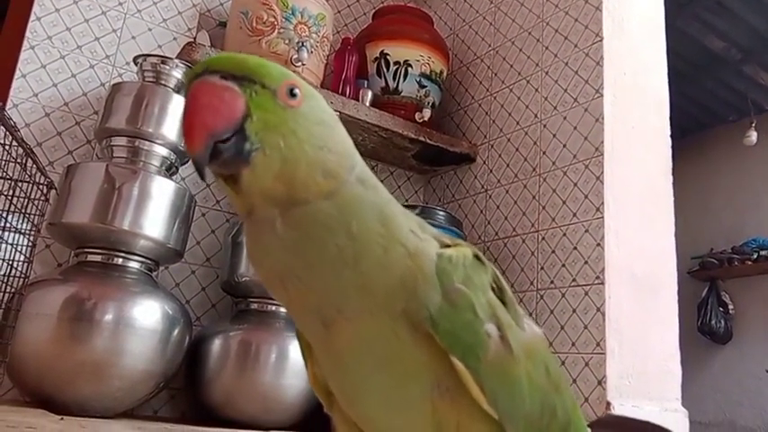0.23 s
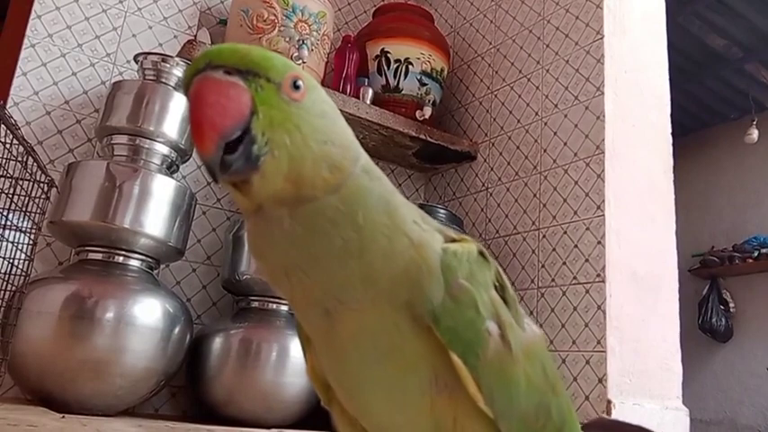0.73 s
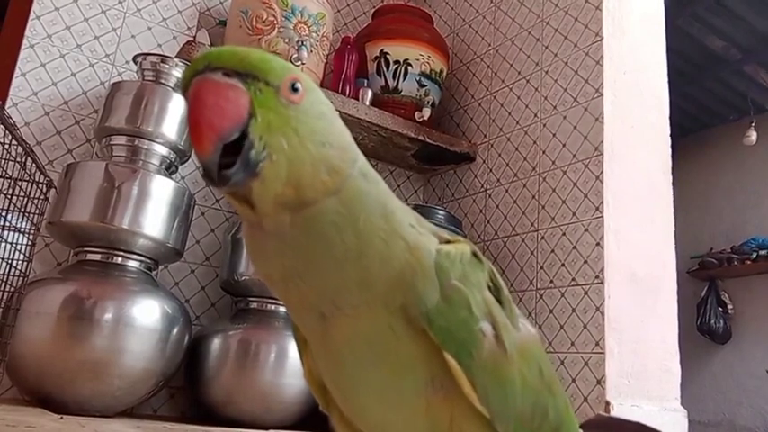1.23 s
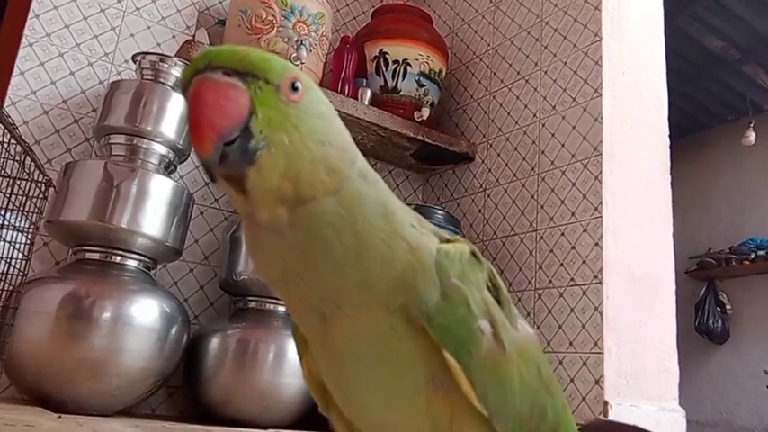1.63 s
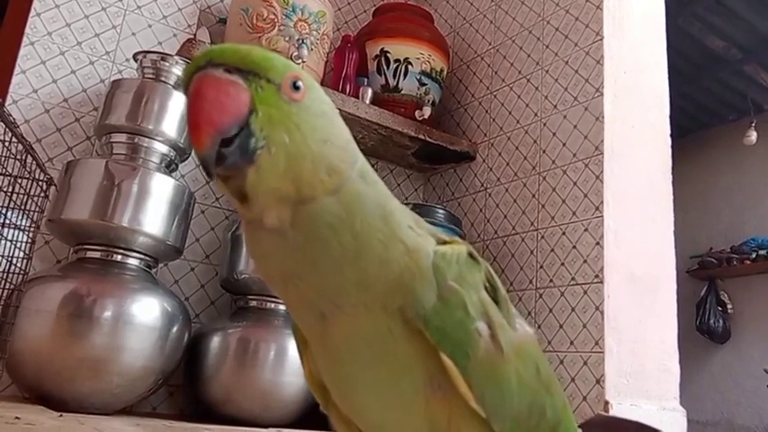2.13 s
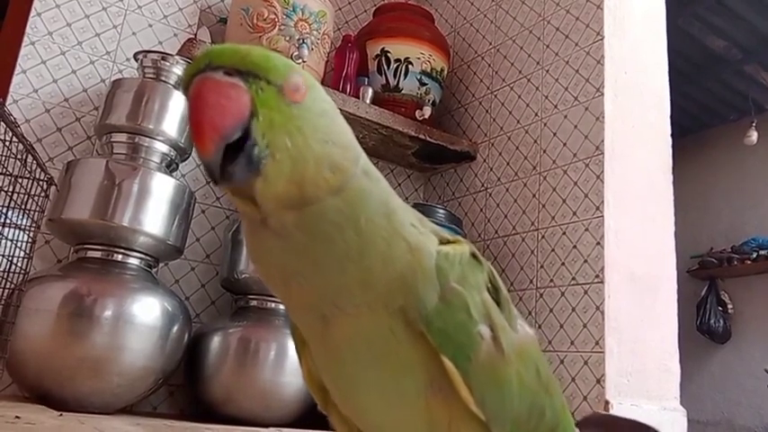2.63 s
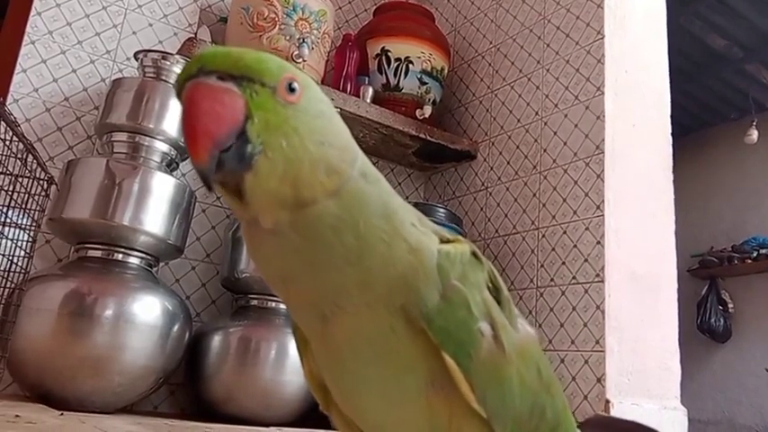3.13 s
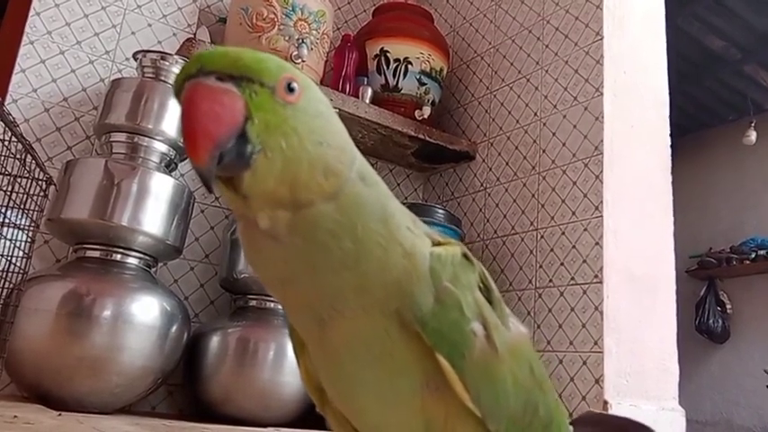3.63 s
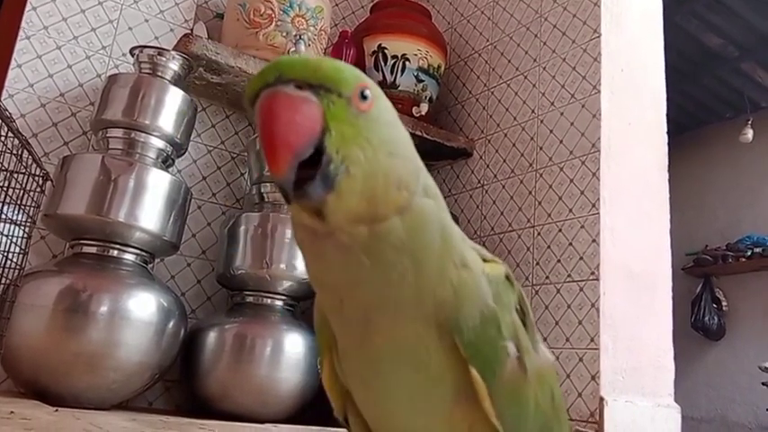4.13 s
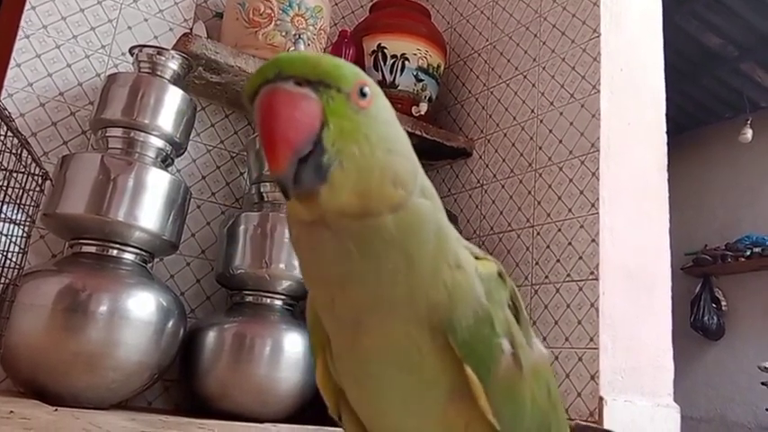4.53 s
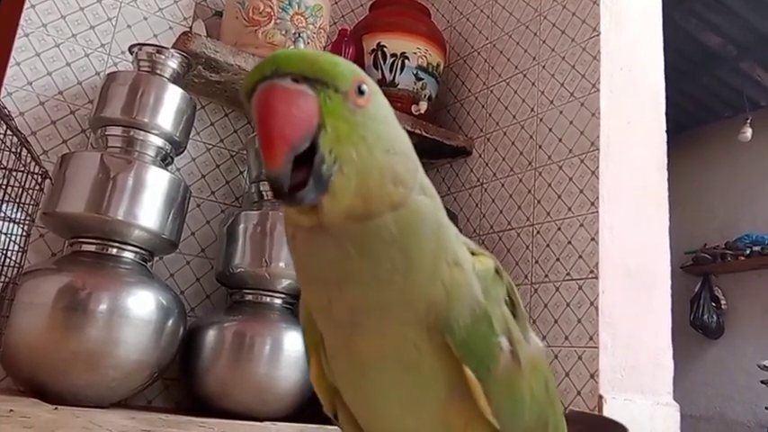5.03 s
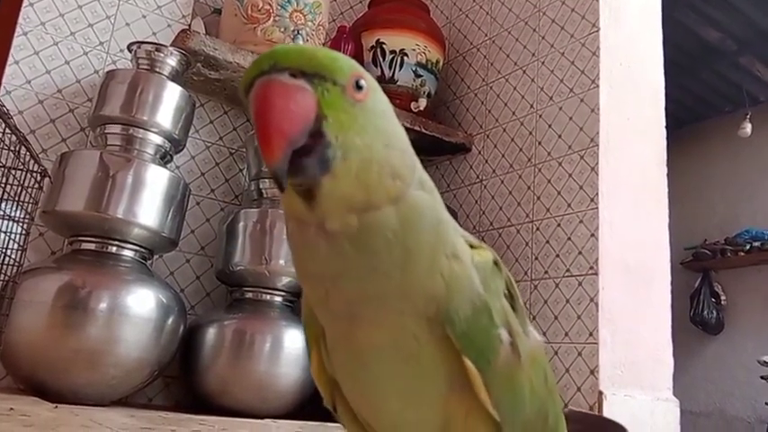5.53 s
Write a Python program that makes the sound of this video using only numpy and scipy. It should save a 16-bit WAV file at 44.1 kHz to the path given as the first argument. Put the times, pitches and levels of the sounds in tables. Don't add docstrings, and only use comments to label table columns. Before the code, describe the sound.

A parrot very near a phone microphone chatters in brief separate calls: an upward chirp, squeaks that drop sharply, a sinking trill, a loud descending whistle, then a swelling rise. Clucks, clicks and a murmur follow, then a piercing high sweep, a warbling squawk and a faint last chirp. A small hard-walled kitchen adds a short bright echo over quiet room hush.

```python
import sys
import numpy as np
from scipy import signal
from scipy.fft import rfft, irfft
from scipy.io import wavfile

SR = 44100
rng = np.random.default_rng(int(sys.argv[2]) if len(sys.argv) > 2 else 0)


def volts_from_db(level):
    exponent = np.asarray(level, float) / 20
    return 10 ** exponent


def unload_audio(sound):
    columns = np.transpose(np.atleast_2d(sound))
    steps = np.round(np.clip(columns, -1, 1) * 32767)
    wavfile.write(sys.argv[1], SR, steps.astype(np.int16))


N = 254898
TIME = np.arange(N) / SR

# [t/s, pitch f/Hz, level/dB, tilt/(dB per octave), even partials/dB, roughness/0-1]
WHISTLES = [
    [(0, 1393, -38.5, -13.5, -7, 0.1), (0.03, 1654, -46.5, 4, -19, 0), (0.055, 1933, -32.5, 6.5, -19, 0.2),
     (0.075, 2310, -24.5, 0, -30, 0.08), (0.09, 2433, -34.5, -11, 4, 0.2), (0.098, 2370, -52, 3, -14, 0.2)],
    [(0.23, 1555, -53.5, -3, -1, 0.2), (0.3, 1607, -47.5, -0.5, -9, 0.2), (0.35, 1598, -48, 1.5, -7, 0.2),
     (0.39, 1670, -46.5, 5, -12, 0), (0.408, 1896, -36.5, 4, -21.5, 0.2), (0.425, 2190, -27.5, 2.5, -38, 0),
     (0.442, 2794, -34, -8.5, 9, 0), (0.45, 2820, -49.5, -1, 1, 0.1)],
    [(0.806, 2606, -45, -12, 17, 0), (0.815, 2450, -33, -1, 13.5, 0.2), (0.84, 2410, -31, -1, 11, 0.1),
     (0.873, 2630, -25, 6.5, 0.5, 0), (0.879, 2286, -28, 5.5, -13, 0.2), (0.885, 1663, -26, -0.5, 7, 0),
     (0.9, 1469, -24, 2, -6.5, 0), (0.915, 966, -25.5, 6, -5.5, 0.1), (0.928, 650, -29.5, -5.5, -4.5, 0.1),
     (0.938, 650, -38.5, 4, 6, 0)],
    [(1.026, 2680, -41, -2, -11, 0), (1.035, 2528, -33, 3.5, 4, 0.1), (1.06, 2470, -26, 3, 7, 0),
     (1.09, 2712, -24.5, 0, 10, 0.1), (1.096, 2130, -28.5, 7, -14.5, 0), (1.102, 1645, -24, -2, 11.5, 0.1),
     (1.115, 1522, -22.5, 3, -6.5, 0.08), (1.13, 1020, -24.5, 5.5, 3, 0), (1.143, 665, -28, -1, -8.5, 0),
     (1.153, 656, -54.5, -5, -20, 0.1)],
    [(1.876, 2003, -54, -12, -3, 0.1), (1.882, 2026, -22, 1.5, 9, 0), (1.9, 1952, -21.5, -7, 22.5, 0.09),
     (1.92, 1653, -20, 1.5, 12, 0), (1.93, 1796, -22, -2, 18, 0), (1.95, 1593, -22.5, -0.5, 11.5, 0),
     (1.995, 1530, -24.5, -0.5, 1.5, 0), (2.01, 1366, -28, 3, -2, 0), (2.025, 1177, -25, -0.5, 3, 0.07),
     (2.065, 1144, -25.5, -2.5, 13, 0.01), (2.078, 1024, -50.5, -1, 8, 0.1)],
    [(2.205, 444, -57, -3, 15, 0.2), (2.23, 779, -45, -15, -3, 0.2), (2.26, 749, -35, -8.5, 7, 0.2),
     (2.3, 736, -31.5, -1.5, -7.5, 0), (2.34, 796, -27, 0, 0.5, 0), (2.36, 905, -37, -2, 1, 0.2),
     (2.372, 1134, -28, 1.5, 3, 0.1), (2.4, 1363, -27.5, 1.5, -3, 0), (2.45, 1463, -26.5, 2.5, 0.5, 0.14),
     (2.5, 1476, -20.5, 3, -4.5, 0), (2.515, 1416, -24, 6.5, -5.5, 0.2), (2.535, 1260, -31.5, -5.5, 1, 0.2),
     (2.545, 1080, -51, 8, 7, 0.1)],
    [(2.98, 1206, -65, -12, -5, 0.1), (3.0, 1219, -35, -20.5, -20, 0), (3.05, 1208, -31.5, -11, -29, 0.06),
     (3.12, 1299, -39, -7, -13, 0), (3.16, 1384, -35, -7.5, -23, 0), (3.18, 1690, -39, 5.5, -4, 0.1),
     (3.2, 2246, -33.5, 3.5, -28, 0.1), (3.212, 2540, -39.5, -6.5, 14.5, 0.2)],
    [(4.512, 523, -64, -25, 8, 0.1), (4.535, 591, -39.5, -20.5, 21, 0.2), (4.57, 750, -42, -20, 4, 0.06),
     (4.59, 1009, -36, -20, 1.5, 0), (4.603, 1314, -35.5, -12.5, -28, 0), (4.64, 1708, -44, 6.5, -23, 0.1),
     (4.7, 2702, -31.5, 0.5, 2.5, 0.17), (4.74, 3278, -19, -3, -9, 0), (4.775, 3526, -18.5, 1, 3.5, 0),
     (4.8, 3304, -22, -12.5, 11, 0), (4.815, 2580, -32.5, -1, 0.5, 0.1), (4.84, 1820, -47, 1, -8, 0),
     (4.88, 1730, -45, 1.5, -7, 0), (4.92, 2092, -36, 7, -16, 0), (4.96, 2920, -29.5, 0.5, 10.5, 0.2),
     (4.972, 3020, -55, -22, 5, 0)],
    [(5.466, 3074, -47, -6, 7, 0.1), (5.474, 2897, -25.5, 5.5, -16.5, 0.1),
     (5.485, 2880, -31.5, -0.5, 12, 0.1), (5.494, 2045, -26.5, 8.5, -15, 0),
     (5.503, 1185, -27, -1, -0.5, 0.2), (5.513, 1171, -29.5, -3.5, 1, 0), (5.522, 940, -42.5, 0, -7, 0.05)],
    [(5.62, 1376, -62, -13, 10, 0), (5.64, 1304, -36, -20, -13, 0.2), (5.7, 1266, -37, -19, -19, 0.2),
     (5.74, 1333, -47.5, -21, -9, 0.2), (5.765, 1690, -47, -2, -33, 0.2), (5.78, 1877, -43.5, 5, -12, 0.2)],
]
# [t/s, pitch f/Hz, level/dB, tilt/(dB per octave), even partials/dB, roughness/0-1]
SQUAWKS = [
    [(0.652, 490.5, -47, -8, -1, 0.5), (0.66, 541.4, -27, 1, -6, 0.5), (0.68, 973, -27, 3, 0, 0.1),
     (0.692, 1390, -23.5, 2, -1, 0.3), (0.705, 865, -23.5, 4, 2, 0.7), (0.72, 639, -27, -3, -6, 0.1),
     (0.733, 621, -46, 12, 2, 0.2)],
    [(1.378, 1407, -80, 2, -2, 0.2), (1.39, 1399, -57, -15, -8, 0), (1.405, 1400, -34, 2, -1, 0),
     (1.47, 1345, -27, -0.5, 3, 0), (1.53, 1131, -27.5, 1, 2.5, 0), (1.6, 950, -26.5, 0, 0, 0),
     (1.66, 915, -26, -0.5, -4.5, 0), (1.72, 956, -27.5, 0.5, 1.5, 0.08), (1.742, 898, -30, -1.5, -3, 0),
     (1.754, 792, -48, -9, -6, 0)],
    [(2.84, 780, -64, 0, -8, 0.7), (2.844, 801, -20, 4, 5.5, 0.6), (2.849, 883, -46.5, -4, -3, 0.5),
     (2.853, 800, -43, 2, -1, 0.7)],
    [(3.318, 500, -47.5, 0.5, -2, 0.1), (3.335, 512, -41, -7, 1, 0.2), (3.36, 480.5, -34, -2, -2, 0.2),
     (3.385, 491.6, -32, -1.5, 1, 0.2), (3.413, 496, -26.5, 2, -3, 0.08), (3.421, 507, -48.5, -12, 3, 0.2)],
    [(3.451, 692, -50.5, -11, -1, 0.5), (3.455, 764, -23, -7, -1, 0.7), (3.46, 1117, -29, 15, -2, 0.2),
     (3.464, 1122, -40, -9, -9, 0.3)],
    [(3.467, 629, -43.5, -16, -4, 0), (3.47, 678, -24, 4.5, -2, 0.2), (3.478, 991, -35, -5.5, 0, 0),
     (3.49, 539, -28, -1, 0, 0), (3.517, 531.3, -35.5, -4, -3, 0.1), (3.53, 515.3, -42.5, -6.5, 5, 0),
     (3.57, 518, -41, -13, 7, 0.07), (3.62, 576.4, -37, -9, 6, 0), (3.66, 611, -36, -5, 4.5, 0),
     (3.78, 658.3, -35.5, -4.5, -3.5, 0.03), (3.8, 635, -33, -9, 3.5, 0.1), (3.82, 545, -40, -3.5, -6, 0.2),
     (3.84, 444, -46, -9, 1.5, 0.1)],
    [(4.19, 512, -69.5, -4, 8, 0.2), (4.197, 508, -30, -1, 0, 0), (4.218, 497.5, -29, -3.5, -1, 0.15),
     (4.225, 644, -34, 4, -1, 0.2), (4.232, 756, -34, -4.5, -10, 0), (4.24, 600, -57, 12.5, 0, 0)],
    [(4.304, 757, -54, -9, -4, 0.5), (4.31, 746, -24, 1.5, -7.5, 0.4), (4.35, 742, -28.5, 1, 6, 0.5),
     (4.38, 747, -31, -11, 4.5, 0.2), (4.41, 750, -41, -9, 4, 0.4), (4.422, 725, -51, -17, -11, 0.5)],
    [(5.168, 429, -54, 7, -1, 0.5), (5.178, 541.2, -30, -1.5, -3, 0.3), (5.205, 1171, -27.5, 2.5, 5, 0.5),
     (5.225, 730, -25.5, 0.5, -7, 0.3), (5.245, 1012, -27.5, 3.5, -6, 0.7), (5.265, 623, -25.5, 1.5, -9, 0),
     (5.3, 611.3, -29.5, 3, 4.5, 0.6), (5.325, 728.6, -23.5, 2, -10.5, 0.3),
     (5.342, 1045, -29.5, 1, 1, 0.6), (5.36, 763, -25, 2.5, -3, 0.5), (5.374, 663, -39, -5, -9, 0.5)],
]
# [t/s, phase/beats so far, pitch swing/share, gate depth/dB]
TONGUE_TRILLS = [
    [(1.375, -2, 0.12, 39.5), (1.405, 1.0, 0.08, 26.5), (1.427, -2, .1, 20), (1.445, 4, .1, 21.5),
     (1.481, 5.0, 0.13, 0.5), (1.62, 12.0, 0.15, 3.5), (1.663, 14.5, .12, 2.5), (1.713, 14.5, 0.077, -0.5),
     (1.722, 17.5, .001, 4.8)],
    [(4.303, 0, 0.14, 35), (4.345, 3.5, .2, 40), (4.38, 5.5, .2, 15), (4.422, 7, .2, -1)],
]
PITCH_LAG = [0.0056, 0.26]
# [t/s, pitch f/Hz, level/dB]
SECOND_VOICE = [
    [(.27, 1204, -75), (.31, 1199, -54), (.35, 1210, -58), (.39, 1230, -75)],
    [(2.995, 800, -62), (3.03, 826, -52.5), (3.09, 930, -67), (3.15, 1050, -70)],
    [(5.63, 920, -78), (5.65, 905, -49), (5.69, 924, -61), (5.73, 960, -50)],
]
# [f/Hz, level/dB]
THROAT = [(240, -43), (400, -7), (1220, 2), (2400, 2.5), (3370, 1), (4580, -4.5), (5270, -11), (6500, -15),
          (8000, -25), (9000, -17), (11900, -12), (13100, -54), (14800, -22.5), (16000, -40.5)]
# [t/s, peak level/dB, ring f/Hz]
BEAK_TICKS = [
    (0.171, -34.5, 3100),
    (4.066, -41, 1330),
]
# [t/s, level/dB, centre of band f/Hz]
RUMBLE = [
    [(2.34, -92, 303), (2.4, -60, 293), (2.966, -88, 294), (3.5, -73.5, 298)],
    [(5.6, -90, 302), (5.692, -53, 310), (5.78, -57.5, 310)],
]
# [f/Hz, level/dB]
FLOOR = [(15, -47.5), (25, -16.5), (159, 3), (394, -17), (661, -3.5), (1140, -26), (1290, 17.5), (1450, -2),
         (9000, -36), (11700, -79.5), (19800, -120)]
# [f/Hz, decay/s]
ROOM_T60 = [(500, 0.31), (1300, 0.34), (3500, 0.47), (9000, 0.29), (15000, 0.1)]


def rms_one(x):
    return x / np.sqrt(np.mean(x ** 2) + 1e-20)


def at_hz(points, hz):
    table_hz, values = np.transpose(points)
    return np.interp(np.log(hz), np.log(table_hz), values)


def span(rows):
    s, *columns = np.transpose(rows)
    part = slice(int(s[0] * SR), int(s[-1] * SR))
    return part, [np.interp(TIME[part], s, c) for c in columns]


def wobble(hz):
    low_pass = signal.butter(2, hz, fs=SR, output="sos")
    return rms_one(signal.sosfilt(low_pass, rng.standard_normal(N)))


def coloured(spectrum):
    hz = np.arange(N // 2 + 1) * SR / N + 1
    shaped = rfft(rng.standard_normal(N)) * volts_from_db(at_hz(spectrum, hz))
    return rms_one(irfft(shaped, N))


def syrinx():
    out = np.zeros(N)
    bend, gate_db = tongue_trills()
    jitter, shimmer = wobble(250), wobble(86)
    rasp = np.array([wobble(860), wobble(570), wobble(490)])
    for rows in WHISTLES + SQUAWKS:
        part, (hz, level_db, tilt_db, even_db, rough) = span(rows)
        rough = np.clip(rough, 0, 1)
        hz = hz * bend[part] * (1 + 0.036 * rough * jitter[part])
        phase = 2 * np.pi * np.cumsum(hz) / SR
        k = np.arange(1, int(16000 / hz.min()) + 1)[:, None]
        partial_hz = k * hz
        gain_db = at_hz(THROAT, partial_hz) + tilt_db * np.log2(k) + even_db * (k % 2 == 0)
        gain = volts_from_db(gain_db) * (partial_hz < 16500)
        smear = np.clip(rough * (partial_hz / 4000) ** 1.41, 0, 1)
        noise = rasp[:, part][k[:, 0] % 3]
        swell = np.sqrt(1 - smear ** 2) + smear * noise
        tone = np.sum(gain * swell * np.cos(k * phase + 0.3 * k), axis=0)
        evened = tone / np.sqrt(np.sum(gain ** 2, axis=0) / 2)
        out[part] += evened * volts_from_db(level_db + gate_db[part] + 0.99 * shimmer[part])
    return out


def room(x):
    t = TIME[:int(0.7 * SR)]
    tail = np.zeros(len(t))
    for hz in 250 * 2.0 ** np.arange(7):
        edges = [hz / np.sqrt(2), min(hz * np.sqrt(2), 19000)]
        band = signal.butter(2, edges, "band", fs=SR, output="sos")
        decay = volts_from_db(-60 * t / at_hz(ROOM_T60, hz))
        tail += signal.sosfilt(band, rng.standard_normal(len(t))) * decay
    tail *= np.clip(t / 0.015, 0, 1)
    return signal.fftconvolve(x, tail / np.sqrt(np.sum(tail ** 2)))[:N]


def noise_floor():
    return volts_from_db(-68) * coloured(FLOOR)


def two_ports(mid):
    port_db, port_hz, delay = -40, 7000, 200
    treble = signal.butter(8, port_hz, "high", fs=SR, output="sos")
    side = signal.sosfilt(treble, np.roll(mid, delay))
    return mid + volts_from_db(port_db) * side * [[1], [-1]]


def beak_ticks():
    out, t = np.zeros(N), TIME[:1500]
    for s, db, hz in BEAK_TICKS:
        ring = np.sin(2 * np.pi * hz * t) * np.exp(-t / 0.0026)
        crack = 0.16 * rng.standard_normal(len(t)) * np.exp(-t / 0.0018)
        start = int(s * SR)
        out[start:start + len(t)] += volts_from_db(db) * (ring + crack)
    return out


def second_voice():
    out = np.zeros(N)
    for rows in SECOND_VOICE:
        part, (hz, level_db) = span(rows)
        out[part] += volts_from_db(level_db - 1) * np.sin(2 * np.pi * np.cumsum(hz) / SR)
    return out


def tongue_trills():
    bend, gate_db = np.ones(N), np.zeros(N)
    for rows, lag in zip(TONGUE_TRILLS, PITCH_LAG):
        part, (beats, swing, depth_db) = span(rows)
        bend[part] = 1 + swing * np.cos(2 * np.pi * (beats - lag))
        closed = ((1 - np.cos(2 * np.pi * beats)) / 2) ** 1.85
        gate_db[part] = -depth_db * closed + 0.085 * depth_db
    return bend, gate_db


def furniture_rumble():
    out, lumps = np.zeros(N), volts_from_db(7.9 * wobble(30))
    centres = np.geomspace(75, 850, 8)
    bands = [coloured([(hz / 1.9, -30), (hz, 0), (hz * 1.5, -30)]) for hz in centres]
    for rows in RUMBLE:
        part, (level_db, centre_hz) = span(rows)
        gains = [volts_from_db(-14 * np.log2(hz / centre_hz) ** 2) for hz in centres]
        mix = sum(g * b[part] for g, b in zip(gains, bands))
        mix = mix / np.sqrt(sum(g ** 2 for g in gains))
        out[part] += volts_from_db(level_db) * mix * lumps[part]
    return out


def scene():
    bird = syrinx() + second_voice() + beak_ticks()
    mid = bird + volts_from_db(-15) * room(bird) + furniture_rumble() + noise_floor()
    return two_ports(mid)


def roll_off(x):
    return signal.sosfilt(signal.butter(12, 16820, fs=SR, output="sos"), x)


def record(dry):
    return roll_off(dry)


dry = scene()
out = record(dry)
unload_audio(out)
```